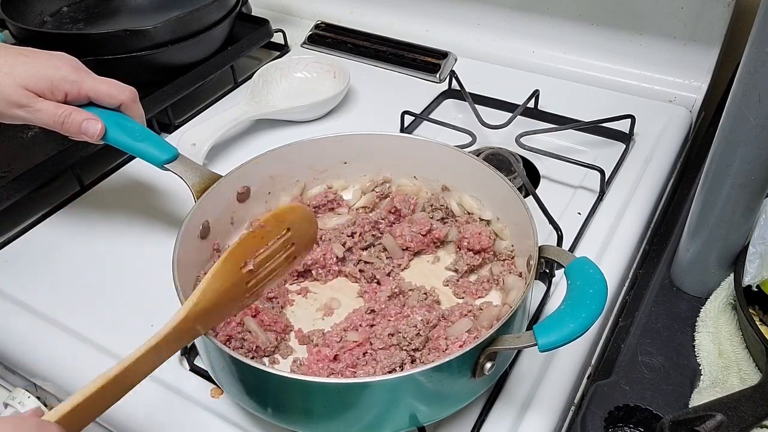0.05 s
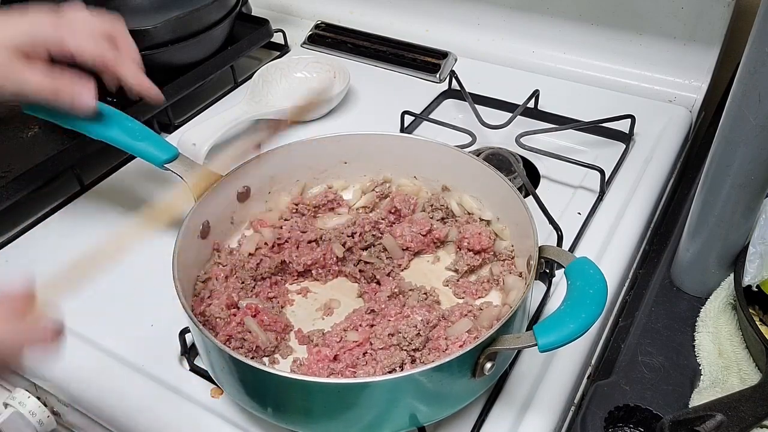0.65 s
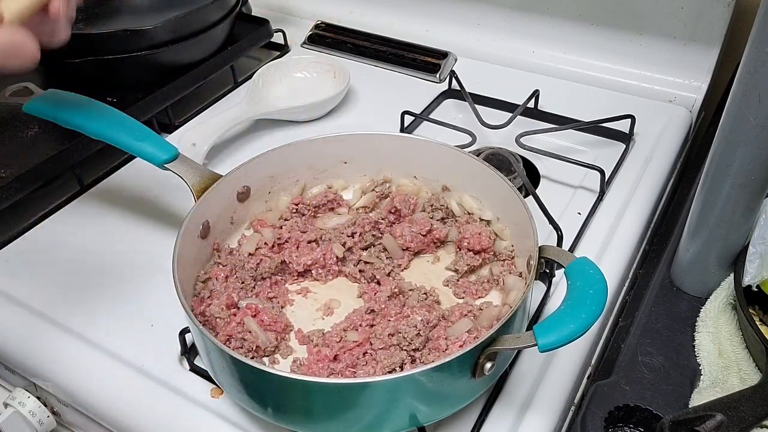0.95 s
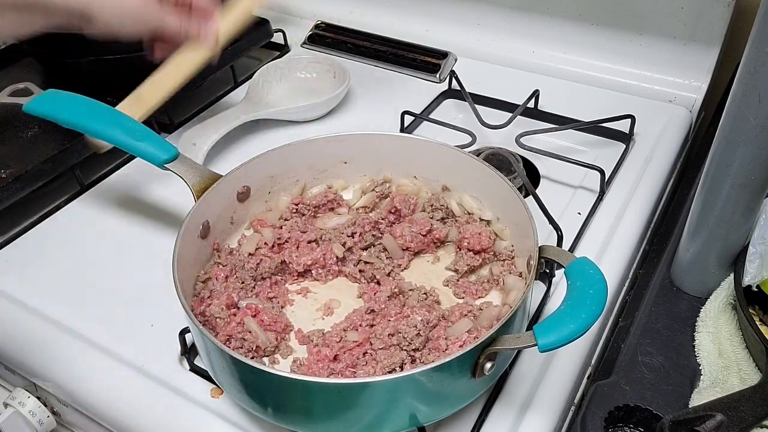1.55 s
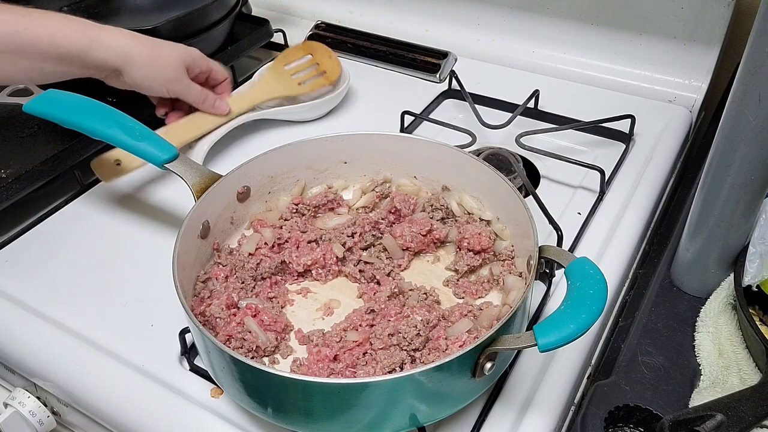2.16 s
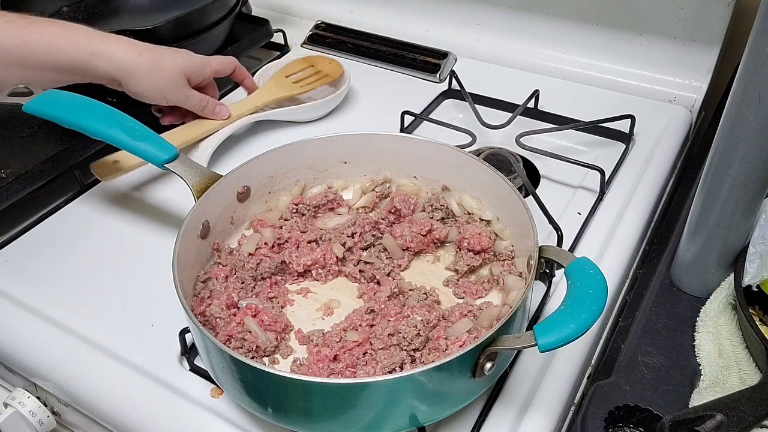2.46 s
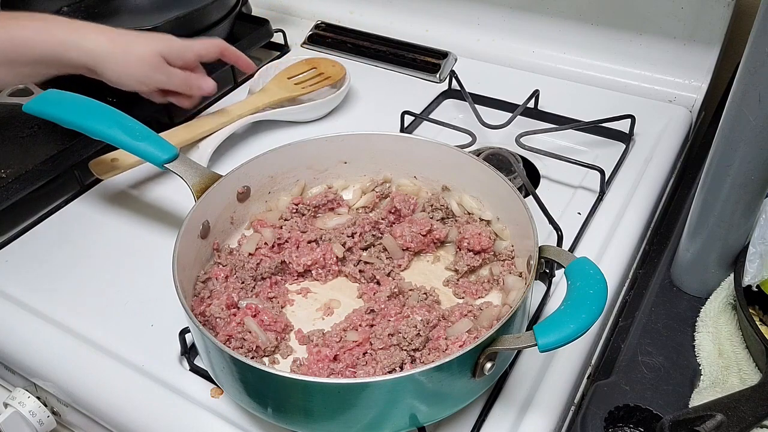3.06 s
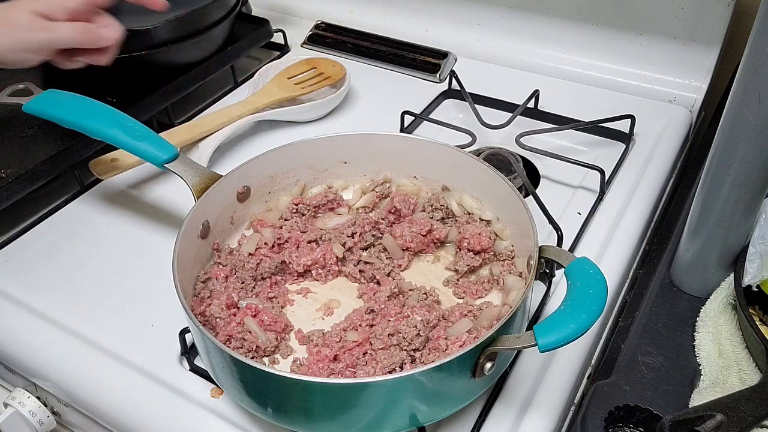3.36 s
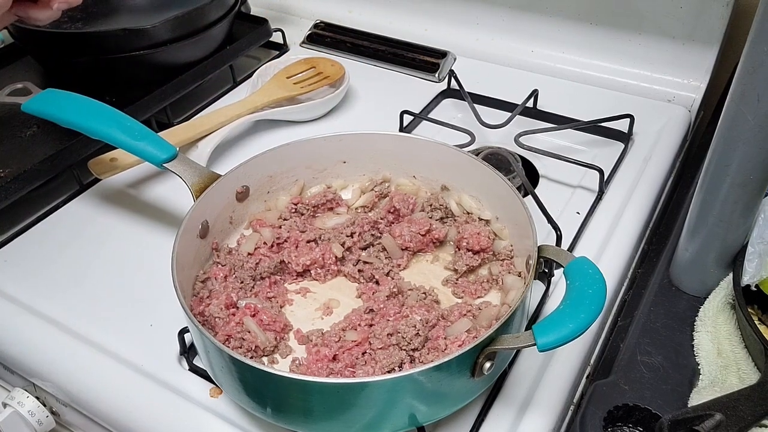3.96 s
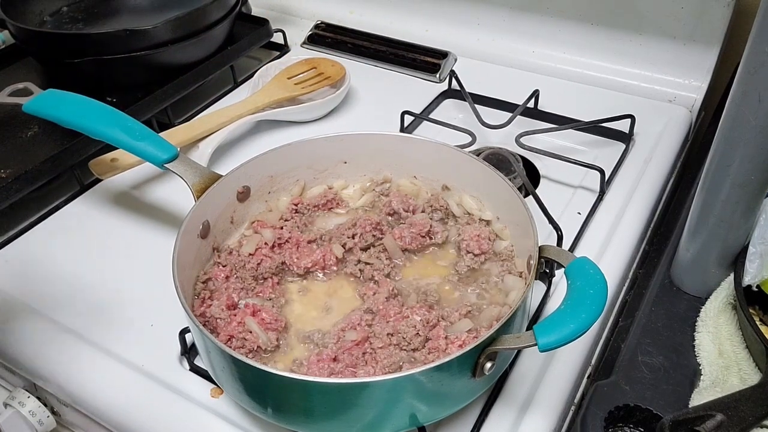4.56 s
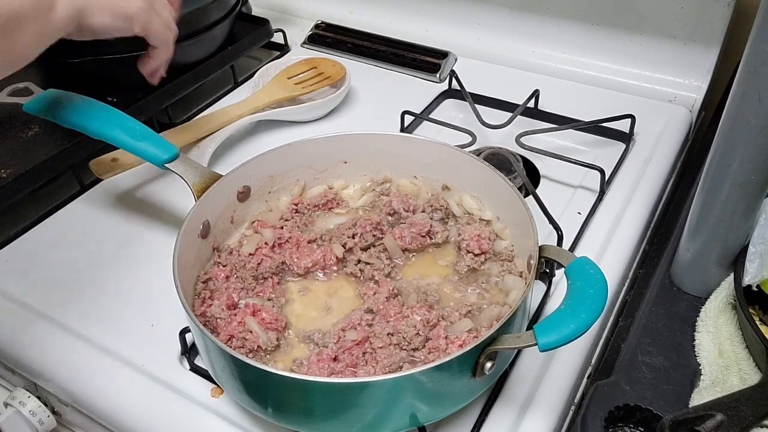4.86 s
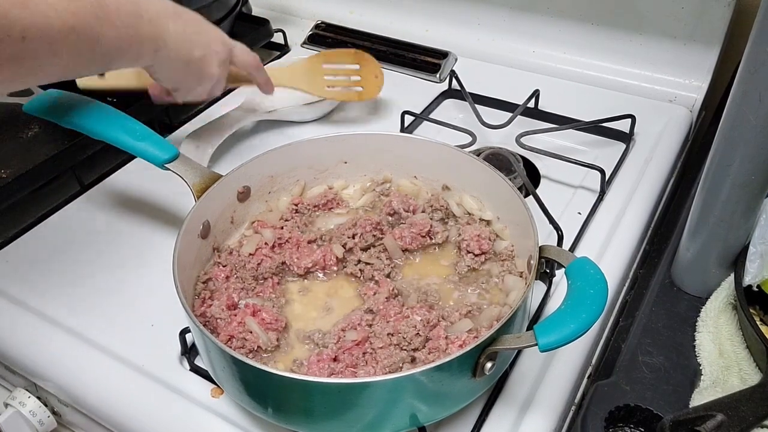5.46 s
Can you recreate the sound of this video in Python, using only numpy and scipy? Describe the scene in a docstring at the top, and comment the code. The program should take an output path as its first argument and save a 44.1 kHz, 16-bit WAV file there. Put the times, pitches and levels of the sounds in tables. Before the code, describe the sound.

Quick wooden knocks on a frying pan, a lighter clatter as the spoon is set down, then soft frying in a quiet kitchen.

```python
"""Wooden spoon and frying pan

A wooden spoon raps the rim of a full pan, then is laid on a ceramic rest on a sheet-steel stove top;
each impact excites damped modes and a short reverberation. A gas burner's faint rush, a low drone and
mains hum fill the small kitchen. Later a steady sizzle of frying, tiny bubbles bursting in fat,
cuts in abruptly, and the spoon knocks and slides on its rest as it is picked up again."""
import sys
import numpy as np
from scipy import signal
from scipy.fft import rfft, irfft, next_fast_len
from scipy.io import wavfile
from scipy.ndimage import uniform_filter1d, map_coordinates

SR = 44100
rng = np.random.default_rng(int(sys.argv[2]) if len(sys.argv) > 2 else 0)


def unload_wav(signal):
    """Save mono or channel-first audio to the path in sys.argv[1] as 16-bit WAV at rate SR, clipped to [-1, 1]."""
    wavfile.write(
        sys.argv[1],
        SR,
        np.round(np.clip(np.atleast_2d(signal).T, -1, 1) * 32767).astype(np.int16),
    )


N = 251811
TIME = np.arange(N) / SR
LIFE = SR // 2  # samples in one impact
AGE = np.arange(LIFE) / SR
TOP_HZ = 15800

# raps on the rim, the first already decaying:
# t/s, level/dB, pan ring re level/dB, tilt/(dB per octave), factor on reverberation time
RIM_RAPS = [(-0.095, -25.5, 2, -2, 1.1), (0.0799, -24.2, 1.8, 0.5, 0.92), (0.2545, -26.5, 0.7, 0.5, 1),
            (0.4515, -21.7, -4.5, -0.9, 1.1)]
# dense spectrum of wood striking the pan: f/Hz, level/dB
RAP_SPECTRUM = [(30, -25.5), (60, -7.5), (115, -10.5), (180, -17), (250, 1.5), (560, -7.5), (1000, -1),
                (1700, 1), (2200, -6.5), (4400, -11), (5800, -17.5), (8000, -19.5), (10000, -28),
                (15500, -37.5)]
# modes of the loaded pan: f/Hz, level/dB, T60/s
PAN_MODES = [(290.3, -10, 0.66), (311, 3.5, 0.24), (390.6, -6.5, 0.18), (492, 2.5, 0.16),
             (648, -11.5, 0.25), (727, -11.5, 0.37), (819, 0.5, 0.27), (931, 0.5, 0.14),
             (1141, -11.5, 0.23), (1204, -8, 0.2), (1298, -2, 0.17), (1414, -6, 0.17), (1514, -1.5, 0.11),
             (1710, -8.5, 0.27), (1764, -5.5, 0.16), (1863, -9.5, 0.21), (2164, -14.5, 0.19),
             (2697, -13, 0.25), (2810, -9, 0.12), (3030, -15, 0.15), (3320, -17, 0.081),
             (3954, -16.5, 0.16), (4206, -16, 0.24), (4620, -20, 0.16), (7328, -21.5, 0.15),
             (7800, -18, 0.16)]
# modes of the steel stove top: f/Hz, level/dB, T60/s
STOVE_MODES = [(56, -24, 0.98), (80, -28.5, 0.46), (152.6, -14.5, 0.6), (215, -11.5, 0.11), (236, 0, 0.5),
               (259.4, -3.5, 0.21), (307, -2, 0.2), (360, -9, 0.42), (479, -6.5, 0.32), (548, -13.5, 0.34),
               (642, -7.5, 0.2)]
# reverberation time of the kitchen: f/Hz, T60/s
ROOM_T60 = [(100, 0.22), (260, 0.5), (700, 0.31), (1800, 0.23), (4800, 0.24), (12800, 0.22)]
# left-right coherence of the diffuse field: f/Hz, coherence
COHERENCE = [(100, 0.8), (280, 0.94), (550, 0.46), (1000, 0.26), (2000, 0.019), (12000, 0.027)]
# resonances of the burner's mixing tube: f/Hz, bandwidth/Hz, level/dB
TUBE_BANDS = [(1483, 170, 0), (1710, 150, 2)]
# course of the rush in the tube: t/s, level/dB
TUBE_LEVELS = [(1.5, -87), (3.3, -83.5), (3.65, -78), (4.05, -75), (5.7, -87)]
# hiss at the burner's ports: f/Hz, bandwidth/Hz, level/dB
PORT_BANDS = [(6540, 770, 1.5), (8100, 900, -4), (11000, 2500, -12)]
# spectrum of the kitchen's drone: f/Hz, level/dB
DRONE_SPECTRUM = [(20, -28), (55, -9), (110, -11.5), (155, -1.5), (195, -10.5), (240, -2), (300, 0.5),
                  (400, -12.5), (780, -15), (1100, -38), (2500, -41), (16000, -44.5)]
# harmonics of the mains hum: f/Hz, level/dB
HUM_LINES = [(59.2, -69.5), (118.4, -83), (236.9, -65), (296, -74.5), (473, -74.5), (592, -75.5)]
# the spoon touching rest and stove top:
# t/s, level/dB, stove boom re level/dB, contact cut-off/Hz, share on the dish (0-1)
REST_KNOCKS = [(1.872, -59, 9, 520, 0.02), (2.097, -63.5, 7, 490, 0.02), (2.2095, -38, 4.5, 12000, 0.2),
               (2.222, -39.5, 5.5, 1400, 0.1), (2.2351, -43, 3.5, 4200, 0.7), (2.312, -48.5, 4, 2000, 0.5),
               (2.324, -34, -5, 12040, 0.7), (2.412, -58, 14, 380, 0.2), (2.49, -62, 3, 690, 1),
               (2.595, -58.5, 3, 600, 0.3), (2.616, -57.5, 6, 646, 0.9), (2.722, -57, 8, 950, 0.15),
               (2.741, -56.5, 9.5, 2900, 0.95), (2.782, -66, 15, 1500, 0.1), (2.899, -57.5, -2.5, 550, 0),
               (4.741, -55, 11, 340, 0.03), (5.3645, -37.8, -3.5, 7000, 0),
               (5.395, -43.5, -0.5, 2000, 0.04), (5.439, -56, 9, 500, 0.1), (5.572, -49, -14, 2130, 0.55)]
# dense spectrum of wood striking the rest: f/Hz, level/dB
KNOCK_SPECTRUM = [(30, -42), (70, -5), (170, -9.5), (280, 1.5), (560, -7), (800, -3), (1150, -7.5),
                  (1550, -6.5), (2300, -9), (4400, -11.5), (6000, -18.5), (8500, -21.5), (10500, -21.5),
                  (15500, -33)]
# hollow stove-top tones and the spoon's woody ring, heard when the spoon knocks: f/Hz, level/dB, T60/s
HOLLOW_MODES = [(487, 3, 0.13), (572, -0.5, 0.26), (621, 1.5, 0.22), (830, -9, 0.54), (1310, -11, 0.17),
                (2190, 0.5, 0.11), (2630, -8, 0.17), (2860, -3, 0.061), (2930, -4, 0.1), (3320, -16, 0.13),
                (3600, -9, 0.16), (4830, -9, 0.15), (5070, -9, 0.19)]
# modes of the ceramic rest: f/Hz, level/dB, T60/s
DISH_MODES = [(974, -2, 0.2), (1048, 0, 0.15), (1161, 5, 0.12), (1228, -9, 0.29), (1382, -7, 0.32),
              (2190, -9, 0.25), (3350, -20, 0.19), (3740, -18, 0.32), (3870, -1, 0.12), (4085, -0.5, 0.12),
              (5130, -7, 0.14), (6240, -11, 0.11), (6570, -11, 0.14), (6940, -10, 0.2), (7560, -6.5, 0.13),
              (8170, -7, 0.09), (8920, -10, 0.15), (12100, -14, 0.11)]
# drags over the glaze: midpoint t/s, half duration/s, level/dB
SLIDE_STROKES = [(2.302, 0.072, -54.5), (4.784, 0.05, -58), (5.439, 0.053, -57.5), (5.563, 0.074, -58.5)]
# friction of wood on glaze: f/Hz, bandwidth/Hz, level/dB
FRICTION_BANDS = [(3360, 990, -1.5), (4540, 2400, 2), (2000, 750, 7), (7700, 1400, -2),
                  (11900, 5000, -15.5)]
# spectrum of the frying: f/Hz, level/dB
SIZZLE_SPECTRUM = [(200, -13.5), (400, 1.5), (800, 1.5), (1100, -1), (1700, -2.5), (2100, -8.5),
                   (2600, -12), (3100, -10.5), (3800, -8.5), (6000, -10), (8000, -8), (9500, -10),
                   (12000, -7), (15500, -11)]


def amp(db):
    """Amplitude ratio: a factor of ten for every 20 dB."""
    return 10 ** (np.asarray(db) / 20)


def unit(x):
    """Normalisation to unit rms."""
    return x / np.sqrt(np.mean(x ** 2) + 1e-20)


def along(points, hz):
    """Interpolation on a logarithmic frequency axis."""
    f, value = np.transpose(points)
    return np.interp(np.log(hz + 1), np.log(f + 1), value)


def filtered(x, gain):
    """Minimum-phase filtering: folding the cepstrum gives a causal response of magnitude gain(f)."""
    n = x.shape[-1]
    m = 2 * next_fast_len(n)
    magnitude = np.maximum(gain(np.fft.rfftfreq(m, 1 / SR)), 1e-6)
    cepstrum = irfft(np.log(magnitude))
    cepstrum[1:m // 2] *= 2
    cepstrum[m // 2 + 1:] = 0
    return irfft(rfft(x, m) * np.exp(rfft(cepstrum)), m)[..., :n]


def spread(hz):
    """Mid-side angle of a diffuse field, which is coherent between two points only in the bass."""
    return np.arccos(np.clip(along(COHERENCE, hz), -1, 1)) / 2


def diffuse(pair):
    """Mid-side mixing makes two independent signals a partly coherent left and right."""
    n = pair.shape[-1]
    turn = spread(np.fft.rfftfreq(n, 1 / SR))
    mid, side = irfft(rfft(pair) * [np.cos(turn), np.sin(turn)], n)
    return np.array([mid + side, mid - side])


def add(track, s, sound):
    """Linear superposition of a sound on the track from time s."""
    start = round(s * SR)
    part = sound[:, max(-start, 0):N - start]
    track[:, max(start, 0):][:, :part.shape[1]] += part


def clack(colour, length, rise_s, crack_db, crack_s):
    """An impact is heard as a brief direct crack and an exponentially decaying reverberant tail."""
    hz, t, spectra = signal.stft(diffuse(rng.standard_normal((2, LIFE))), SR, nperseg=256)
    fade_db = -60 * t / (length * along(ROOM_T60, hz)[:, None])
    tail = signal.istft(spectra * amp(fade_db), SR, nperseg=256)[1][:, :LIFE]
    crack = amp(crack_db) * np.exp(-(AGE / crack_s) ** 2) * diffuse(rng.standard_normal((2, LIFE)))
    onset = 1 - np.exp(-AGE / rise_s)
    tail, crack = filtered(np.array([tail, crack]) * onset, colour)
    head_rms = np.sqrt(np.mean(tail[:, :SR // 32] ** 2))
    return (tail + crack) / head_rms


def rim_tick(hz, delay_s, width_s):
    """A short pulse has a wide band: the spoon's edge catches the rim with one bright snap."""
    pulse = np.exp(-((AGE - delay_s) / width_s) ** 2)
    return pulse * np.sin(2 * np.pi * (hz * AGE + rng.random((2, 1))))


def softness(hz, contact_hz):
    """A compliant contact acts as a second-order low-pass on the blow."""
    return 1 / np.hypot(1, (hz / contact_hz) ** 2)


def ring(modes, contact_hz, swell_cycles, scatter_db, direct, direct_s, blur):
    """Free vibration: each damped mode builds up, drops as the direct sound dies, then lingers."""
    hz, db, t60 = np.transpose(modes)[:, :, None]
    strength, phase, lead = rng.standard_normal((len(modes), 3)).T[:, :, None]
    envelope = amp(db + scatter_db * strength - 60 * AGE / t60)
    envelope *= 1 - np.exp(-AGE * hz / swell_cycles)
    envelope *= softness(hz, contact_hz) * (1 + direct * np.exp(-(AGE / direct_s) ** 2))
    # arriving reflections perturb each mode's phase and amplitude
    shift, swing = blur * signal.resample(rng.standard_normal((2, len(modes), 30)), LIFE, axis=2)
    angle = 2 * np.pi * (hz * AGE + phase) + shift
    envelope *= 1 + swing / 2
    side_phase = np.sign(lead) * spread(hz)
    return np.array([np.sum(envelope * np.sin(angle + side * side_phase), 0) for side in (1, -1)])


def raps():
    """Impact excitation: wood strikes the food-damped pan; the grate passes the blow to the stove top."""
    track = np.zeros((2, N))
    for s, db, ring_db, tilt, length in RIM_RAPS:
        colour = lambda hz: amp(along(RAP_SPECTRUM, hz) + tilt * np.log2((hz + 1) / 1000))
        wood = clack(colour, length, rise_s=0.0004, crack_db=8, crack_s=0.0026)
        tick = rim_tick(hz=7485, delay_s=0.0023, width_s=0.00024)
        pan = ring(PAN_MODES, TOP_HZ, swell_cycles=3, scatter_db=0.6,
                   direct=0.8, direct_s=0.027, blur=0.45)
        stove = ring(STOVE_MODES, TOP_HZ, swell_cycles=3.7, scatter_db=4.5,
                     direct=0.77, direct_s=0.046, blur=0.59)
        add(track, s, amp(db) * (wood + amp(ring_db) * pan) + amp(-21.5) * tick + amp(-26.5) * stove)
    return track


def wobble(per_s):
    """Random modulation: a smooth curve through per_s Gaussian values a second."""
    knots = rng.standard_normal(int(N * per_s / SR) + 4)
    return map_coordinates(knots, [TIME * per_s], mode="nearest")


def band_noise(peaks):
    """Resonances shape white noise into bell-shaped bands; the sum has unit rms."""
    gain = lambda hz: sum(amp(db) / (1 + (2 * (hz - centre) / width) ** 2) for centre, width, db in peaks)
    return unit(filtered(diffuse(rng.standard_normal((2, N))), gain))


def burner():
    """Flow noise: gas excites the resonances of the mixing tube and hisses faintly at the ports."""
    tube_db = np.interp(TIME, *np.transpose(TUBE_LEVELS)) + 0.72 * wobble(4.5)
    tube = amp(tube_db) * band_noise(TUBE_BANDS)
    ports = amp(-88.0 + 1.5 * wobble(5)) * band_noise(PORT_BANDS)
    return tube + ports


def drone():
    """A continuous spectrum of low kitchen noise carries the line spectrum of a wavering mains hum."""
    noise = diffuse(rng.standard_normal((2, N)))
    air = unit(filtered(noise, lambda hz: amp(along(DRONE_SPECTRUM, hz))))
    hum = sum(amp(db) * np.sqrt(2) * np.sin(2 * np.pi * hz * TIME + 0.4 * wobble(3.2))
              for hz, db in HUM_LINES)
    return amp(-59.5 + 0.6 * wobble(1.7)) * air + hum


def knocks():
    """Contact time sets the attack: as the spoon rocks on its rest, gentle blows thump, firm ones snap."""
    firm_db, firm_rise_s, doubling_db = -36.5, 0.0005, 5.5
    track = np.zeros((2, N))
    for s, db, boom_db, contact_hz, on_dish in REST_KNOCKS:
        rise_s = firm_rise_s * 2 ** ((firm_db - db) / doubling_db)
        colour = lambda hz: amp(along(KNOCK_SPECTRUM, hz)) * softness(hz, contact_hz)
        wood = clack(colour, length=0.98, rise_s=rise_s, crack_db=5.0, crack_s=0.0023)
        stove = ring(STOVE_MODES, contact_hz, swell_cycles=0.41, scatter_db=3.5,
                     direct=0.19, direct_s=0.005, blur=0.41)
        hollow = ring(HOLLOW_MODES, contact_hz, swell_cycles=1, scatter_db=2,
                      direct=0.8, direct_s=0.003, blur=0.7)
        dish = ring(DISH_MODES, contact_hz, swell_cycles=2.3, scatter_db=1.0,
                    direct=0.33, direct_s=0.0039, blur=0.7)
        # a knock off the dish sounds hollow; one on the dish clinks
        ringing = amp(-4) * (1 - on_dish) * hollow + amp(2) * np.sqrt(on_dish) * dish
        add(track, s, amp(db) * (wood + amp(boom_db) * stove + ringing))
    return track


def slides():
    """Sliding friction: the spoon drags softly and unevenly over the glaze."""
    strokes = sum(amp(db) * np.exp(-((TIME - s) / half) ** 2) for s, half, db in SLIDE_STROKES)
    return strokes * amp(1.7 * wobble(160)) * band_noise(FRICTION_BANDS)


def sizzle(start_s, pops_per_s, size_spread, hiss_db, patchy_db):
    """Shot noise: tiny bubbles burst in the fat and merge into a hiss; patches flare up and settle."""
    steady_db, onset_db, settle_s = -56.5, 1.5, 0.11
    bursts = rng.random((2, N)) < pops_per_s / SR
    sizes = rng.standard_normal((2, N)) * np.exp(size_spread * rng.standard_normal((2, N)))
    hiss = amp(hiss_db) * rng.standard_normal((2, N))
    spectra = signal.stft(diffuse(unit(bursts * sizes) + hiss), nperseg=512)[2]
    patches = uniform_filter1d(rng.standard_normal(spectra.shape[1:]), size=6, axis=0)  # over frequency
    patches = uniform_filter1d(patches, size=16, axis=1)  # over time
    fizz = signal.istft(spectra * amp(patchy_db * unit(patches)), nperseg=512)[1][:, :N]
    fizz = unit(filtered(fizz, lambda hz: amp(along(SIZZLE_SPECTRUM, hz))))
    level_db = steady_db + onset_db * np.exp(-np.abs(TIME - start_s) / settle_s) + 0.087 * wobble(23)
    return amp(level_db) * (TIME > start_s) * fizz


def scene():
    """The pressures of the nearby sources add, a little louder on the right."""
    frying = sizzle(start_s=4.093, pops_per_s=9000, size_spread=0.51, hiss_db=-1.5, patchy_db=1.66)
    contacts = raps() + knocks() + slides()
    return (contacts + frying + burner() + drone()) * amp([[-0.7], [0.7]])


def record(dry):
    """Band limiting: an ideal low-pass removes everything above TOP_HZ."""
    m = next_fast_len(N + SR)
    passband = np.fft.rfftfreq(m, 1 / SR) < TOP_HZ
    return irfft(rfft(dry, m) * passband, m)[:, :N]


dry = scene()
out = record(dry)
unload_wav(out)
```